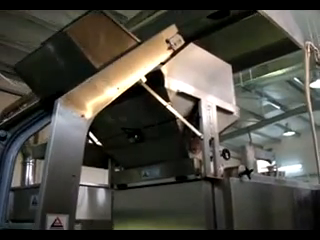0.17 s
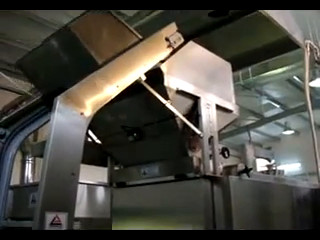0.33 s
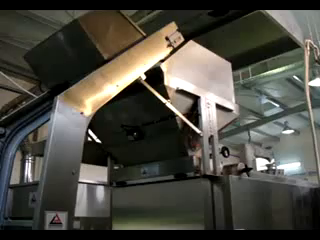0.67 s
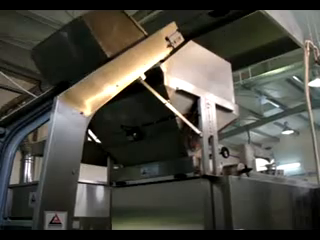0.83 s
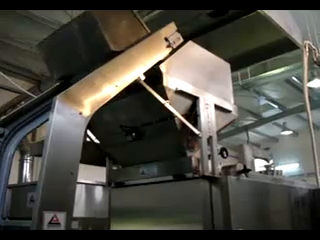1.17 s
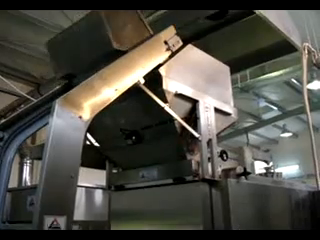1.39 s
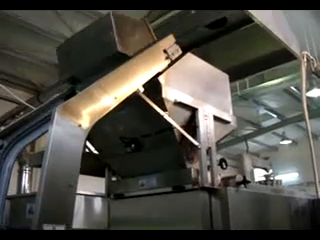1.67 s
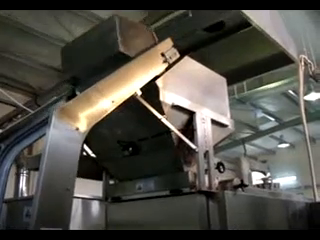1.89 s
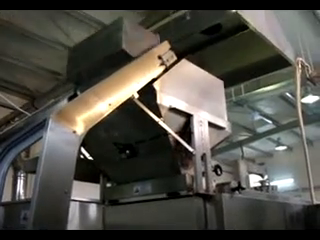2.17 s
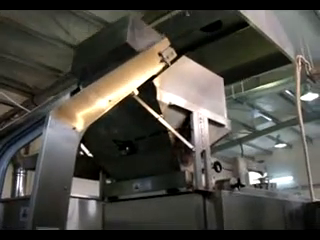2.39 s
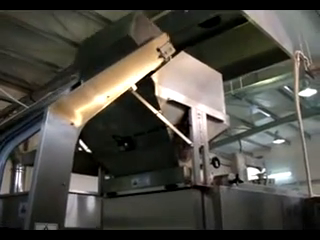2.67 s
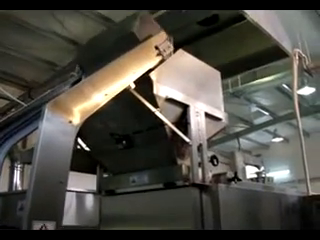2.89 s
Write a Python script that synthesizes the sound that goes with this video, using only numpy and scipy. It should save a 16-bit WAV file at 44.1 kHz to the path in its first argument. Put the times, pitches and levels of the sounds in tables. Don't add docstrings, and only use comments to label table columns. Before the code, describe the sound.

A bucket elevator runs throughout, its chain and buckets knocking on sheet steel so densely that the echoing hall blurs them into a steady, harsh midrange roar. It dips slightly around 0.5 and 1.5 seconds and swells near 2.2. Grain hiss, fan roar and hum lie underneath, with faint wavering gear whines. Soft dull booms fall near 0.2, 0.7, 1.05, 2.25, 2.6 and 2.8 seconds. Small handheld microphone, nearly mono.

```python
import sys
import numpy as np
from scipy import signal
from scipy.fft import rfft, irfft, next_fast_len
from scipy.io import wavfile
from scipy.ndimage import uniform_filter1d, map_coordinates

SR = 44100
rng = np.random.default_rng(int(sys.argv[2]) if len(sys.argv) > 2 else 0)


def inscribe(sig):
    pcm = np.round(np.clip(np.atleast_2d(sig).T, -1, 1) * 32767)
    wavfile.write(sys.argv[1], SR, pcm.astype(np.int16))


def invert_db(level):
    return 10 ** (np.asarray(level, dtype=float) / 20)


N = 133623

# (time [s], level [dB])
CHAIN_LOAD = [(0, -16), (.25, -17.5), (.45, -19.5), (.8, -16), (1.15, -16.5), (1.5, -18.5), (1.95, -17.5),
              (2.2, -15), (2.55, -15.5), (2.85, -16.5), (3.03, -16.5)]
# (frequency [Hz], level [dB])
STEEL_COLOUR = [(250, -47), (450, -10), (650, -3.5), (1100, -2.5), (1600, -5), (2600, -4.5), (4000, -7.5),
                (7000, -17.5)]
# (frequency [Hz], time to fall 60 dB [s])
HALL_DECAY = [(200, 1.2), (2000, 2.23), (9000, 1.2)]
# (time [s], level [dB])
GRAIN_FLOW = [(0, -26.5), (.1, -23), (.31, -19), (.76, -19), (1.07, -20), (1.5, -21.5), (1.86, -19.5),
              (2.1, -21.5), (2.6, -21), (2.8, -21), (3.03, -25.5)]
# (frequency [Hz], level [dB])
GRAIN_COLOUR = [(1000, -25.5), (2500, -0.5), (4000, -1.5), (5500, 1), (7000, 1.5), (8000, -5)]
# (time [s], level [dB])
AIR_LEVEL = [(0, -0.5), (.22, 3), (.48, -1.5), (.8, 0.5), (1.05, 0), (1.3, -1.5), (1.7, 3.5), (1.95, 0),
             (2.2, 1.5), (2.45, -1), (2.62, 0), (2.8, 0.5), (3.03, 2)]
# (frequency [Hz], level [dB])
AIR_COLOUR = [(40, -50.5), (75, -22), (110, -7), (200, -7), (300, -2.5), (600, -1), (1500, -9.5)]
# (time [s], level [dB])
FAN_HUM = [(0.0, -36), (0.14, -32), (0.37, -35.5), (0.89, -30.5), (1.2, -35), (1.87, -31.5), (1.97, -36),
           (2.02, -31.5), (2.27, -28), (2.35, -34), (2.65, -33), (2.86, -40), (2.97, -35), (3.03, -45)]
# (time [s], pitch [Hz], level [dB])
BLOWER_NOTE = [(.55, 224, -54), (.7, 227, -31), (.85, 240, -45.5), (1.0, 249, -34), (1.2, 244, -39.5),
               (1.7, 245, -30), (1.85, 245, -50)]
# (pitch [Hz], level [dB], loudest moment [s], span of the swell [s])
GEAR_WHINES = [(2606, -37, 2.2, 1.6), (2550, -38, 1.8, .6), (4226, -38, 2.1, .25), (1035, -32, 2.45, .17),
               (3770, -39, 2.7, .12), (619, -34, .75, .25), (1050, -36, .6, .9), (855, -34, 2.25, .2),
               (468, -34, 1.75, .12)]
# (frequency [Hz], level [dB])
HAND_COLOUR = [(15, -7), (30, -1), (55, 0), (80, -12), (120, -61)]
# (time [s], boom pitch [Hz], level [dB])
BUCKET_TIPS = [
    (.2, 600, -27),
    (.74, 620, -26),
    (1.05, 646, -26),
    (2.25, 850, -27),
    (2.6, 696, -25.5),
    (2.8, 1450, -27.5),
]
# (lower edge [Hz], upper edge [Hz])
LEAK_BANDS = [(2050, 2950), (5400, 6300)]
# (frequency [Hz], level [dB])
MIC_ROLL_OFF = [(7000, 0.5), (8000, 1), (9000, -5.5), (9600, -12), (9900, -21), (10150, -67)]

STEEL_DB, GRAIN_DB, AIR_DB = -0.37, 1.04, -24
KNOCKS_PER_S, GRAINS_PER_S = 1500, 6000
PANEL_DB, PANEL_HZ, PANEL_SPREAD, PANEL_T60_S = -16, 804.5, 0.45, 0.5
ECHO_DB = 6
FAN_HZ, FAN_DRIFT_HZ, FAN_GAIN_DB = 278.1, 0.3, 1
HAND_DB = -68
TIP_HALF_S, TIP_WIDTH = 0.07, 1.28
LEAK_DB, LEAK_RARE = -45.5, 0.72
EDGE_HZ, EDGE_SWING_HZ = 10030, 170
LIMIT, KNEE = 1.05, 6
IMAGE_DB = -22


def unit(x):
    return x / np.sqrt(np.mean(x ** 2) + 1e-20)


def along(points, hz):
    f, value = np.transpose(points)
    return np.interp(np.log(hz + 1), np.log(f + 1), value)


def curves(rows):
    s, *columns = np.transpose(rows)
    return [np.interp(np.arange(N) / SR, s, column) for column in columns]


def wobble(rate):
    return map_coordinates(rng.standard_normal(200), [np.arange(N) * rate / SR])


def tone(hz):
    return np.sin(2 * np.pi * np.cumsum(hz) / SR)


def coloured(x, points):
    size = next_fast_len(N + 8192)
    gain = invert_db(along(points, np.fft.rfftfreq(size, 1 / SR)))
    return irfft(rfft(x, size) * gain, size)[..., :N]


def patchy(x, depth_db):
    z = signal.stft(x, nperseg=512)[2]
    field = uniform_filter1d(rng.standard_normal(z.shape), 8, 0)
    field = uniform_filter1d(field, 16, 1)
    return signal.istft(z * invert_db(depth_db * unit(field)), nperseg=512)[1][:N]


def impacts(count, spread_db):
    draw = rng.random((int(count * N / SR), 3))
    size = invert_db(-spread_db * np.log(draw[:, 1] + 1e-9))
    push_or_pull = np.sign(draw[:, 2] - 0.5)
    return np.bincount((draw[:, 0] * N).astype(int), size * push_or_pull, N)


def hall(x):
    wet, size = np.zeros(N + 2 * SR), SR // 4
    for start in range(0, N, size):
        hz, t, z = signal.stft(rng.standard_normal(SR), SR, nperseg=256)
        fade = invert_db(-60 * t / along(HALL_DECAY, hz)[:, None])
        tail = signal.istft(z * fade, SR, nperseg=256)[1]
        part = signal.fftconvolve(x[start:][:size], tail)
        wet[start:][:len(part)] += part
    earlier = np.pad(wet[N:], (0, N))[:N]
    return unit(unit(x) + invert_db(ECHO_DB) * unit(wet[:N] + earlier))


def panels():
    draw, t = rng.standard_normal((150, 3)), np.arange(SR // 3) / SR
    out = np.zeros(N + SR)
    for k, (pitch, size, late) in enumerate(draw):
        hz = PANEL_HZ * np.exp(PANEL_SPREAD * pitch)
        ring = np.sin(2 * np.pi * hz * t) * (1 - np.exp(-t / 0.025))
        start = int((k + late % 1) / len(draw) * (N + SR // 3))
        out[start:][:len(t)] += invert_db(4.9 * size - 60 * t / PANEL_T60_S) * ring
    return unit(out[SR // 3:][:N])


def elevator():
    load_db, = curves(CHAIN_LOAD)
    hits = hall(impacts(count=KNOCKS_PER_S, spread_db=1.77))
    knocks = unit(coloured(patchy(hits, depth_db=0.62), STEEL_COLOUR))
    level_db = load_db + STEEL_DB + 0.57 * wobble(8.49)
    return invert_db(level_db) * (knocks + invert_db(PANEL_DB) * panels())


def chute():
    flow_db, = curves(GRAIN_FLOW)
    hits = hall(impacts(count=GRAINS_PER_S, spread_db=1.85))
    hiss = unit(coloured(patchy(hits, depth_db=0.75), GRAIN_COLOUR))
    return invert_db(flow_db + GRAIN_DB + 0.19 * wobble(9.52)) * hiss


def fans():
    rush = patchy(rng.standard_normal(N), depth_db=1.38)
    roar = unit(coloured(rush, AIR_COLOUR + [(6000, -44)]))
    flow_db, = curves(AIR_LEVEL)
    roar_gain = invert_db(AIR_DB + flow_db + 0.44 * wobble(5.4))
    hum_db, = curves(FAN_HUM)
    hum_gain = invert_db(hum_db + FAN_GAIN_DB + 1.4 * wobble(12))
    hum = hum_gain * tone(FAN_HZ + FAN_DRIFT_HZ * wobble(2.9))
    hz, note_db = curves(BLOWER_NOTE)
    note = invert_db(note_db) * tone(hz + 0.52 * wobble(9))
    return roar_gain * roar + np.sqrt(2) * (hum + note)


def gears():
    t, out = np.arange(N) / SR, np.zeros(N)
    for hz, db, loudest, span in GEAR_WHINES:
        swell_db = db - 10 * ((t - loudest) / span) ** 2 + 1.5 * wobble(17)
        out += invert_db(swell_db) * tone(hz + 1.4 * wobble(12))
    return out


def thuds():
    rumble = unit(coloured(rng.standard_normal(N), HAND_COLOUR))
    return invert_db(HAND_DB + 5.6 * wobble(8)) * rumble


def tips():
    t, out = np.arange(N) / SR, np.zeros(N)
    for s, hz, db in BUCKET_TIPS:
        colour = [(hz / 2, -60), (hz / TIP_WIDTH, -6), (hz, 0), (hz * TIP_WIDTH, -6), (hz * 2, -60)]
        boom = unit(coloured(rng.standard_normal(N), colour))
        out += invert_db(db - 9 * ((t - s) / TIP_HALF_S) ** 2) * boom
    return out


def scene():
    mono = elevator() + chute() + fans() + gears() + thuds() + tips()
    return np.tile(mono, (2, 1))


def ragged_top(x):
    hz, t, z = signal.stft(x, SR, nperseg=1024)
    moment = np.minimum(t * SR, N - 1).astype(int)
    edge = EDGE_HZ + EDGE_SWING_HZ * np.round(wobble(17)[moment])
    chance = rng.random((hz.size // 4 + 1, t.size // 2 + 1))
    chance = np.repeat(chance, 2, 1).repeat(4, 0)[:, :t.size][:hz.size]
    holes = chance < (hz[:, None] - edge + 1200) / 3500
    kept = (hz[:, None] < edge) & ~holes
    return signal.istft(z * kept, SR, nperseg=1024)[1][..., :N]


def leak():
    out = np.zeros(N)
    for low, high in LEAK_BANDS:
        band = [(low - 90, -70), (low, 0), (high, 0), (high + 90, -70)]
        noise = unit(coloured(rng.standard_normal(N), band))
        out += noise * np.clip((wobble(27) - LEAK_RARE) * 8, 0, 1)
    return invert_db(LEAK_DB) * out


def band_limit(x):
    return signal.sosfilt(signal.butter(12, 12660, fs=SR, output="sos"), x)


def record(dry):
    limited = dry / (1 + np.abs(dry / LIMIT) ** KNEE) ** (1 / KNEE)
    x = ragged_top(coloured(limited, MIC_ROLL_OFF + [(10600, -140)]))
    mirrored = x * (-1.) ** np.arange(N)
    image = coloured(mirrored, [(11900, -140), (12100, 0), (12400, -15), (13000, -80), (14000, -140)])
    left_right = leak() * [[1], [-1]]
    return band_limit(x + invert_db(IMAGE_DB) * image + left_right)


dry = scene()
out = record(dry)
inscribe(out)
```